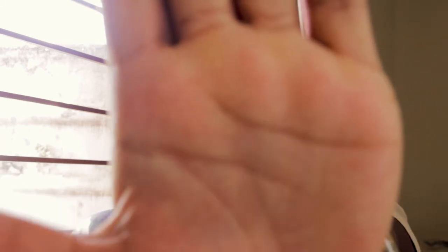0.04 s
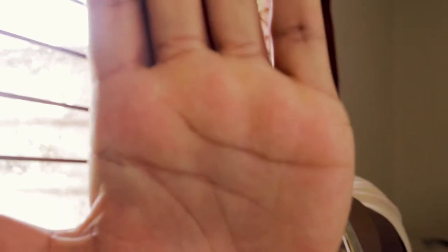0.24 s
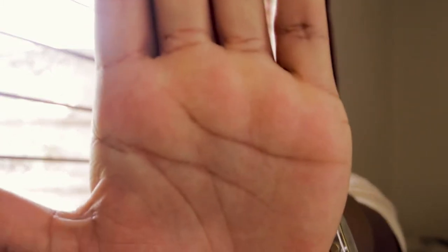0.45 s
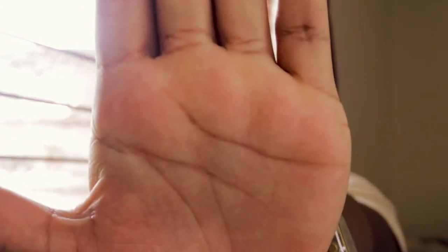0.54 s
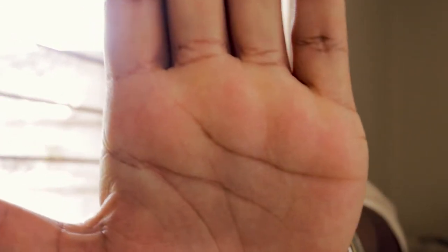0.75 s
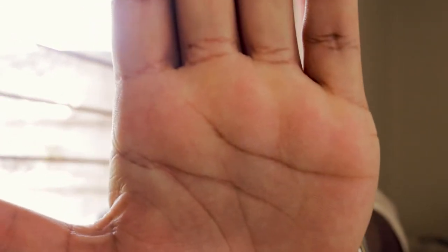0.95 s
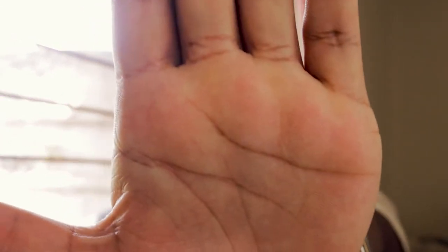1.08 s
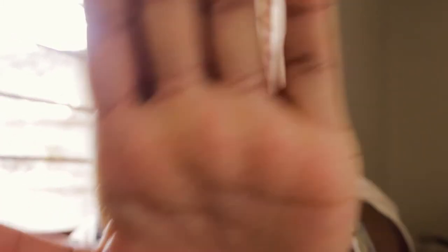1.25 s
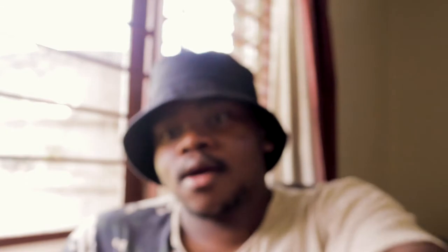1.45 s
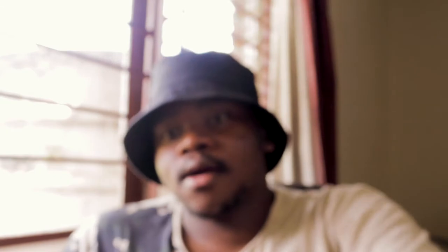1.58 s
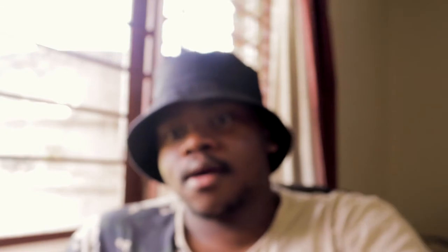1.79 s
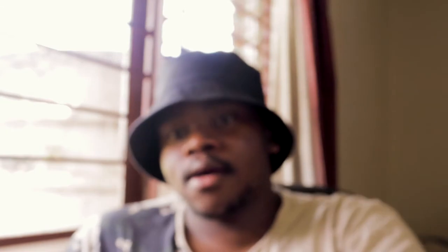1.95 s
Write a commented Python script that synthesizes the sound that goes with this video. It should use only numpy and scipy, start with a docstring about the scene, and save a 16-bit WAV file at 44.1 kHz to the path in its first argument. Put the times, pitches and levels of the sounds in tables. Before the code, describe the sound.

Two gritty, pulsing whirs of a lens focusing motor in quick succession, the first starting with a clack and knock, then near silence in a small room and one low hollow thump.

```python
"""Two rasping whirs in quick succession, the second longer, then about a second later a soft, hollow thump.
A lens focus motor close to the microphone takes up its gear slack with a clack and a hollow knock.
Tooth clicks and friction, stronger once per turn, ring the plastic barrel and small gears over a churn.
Scuffing contacts and decaying sine modes make the thump; filtered noise makes its echo, faint handling,
low room rumble and hiss."""
import sys
import numpy as np
from scipy import signal
from scipy.fft import rfft, irfft
from scipy.io import wavfile
from scipy.ndimage import uniform_filter1d

SR = 44100
rng = np.random.default_rng(int(sys.argv[2]) if len(sys.argv) > 2 else 0)


def transcribe(u):
    """Save the signal u as a 16-bit wav file named by the first command-line argument.

    u: samples, shape (n,) or (channels, n), limited to [-1, 1]; the rate is SR.
    q: integer samples, one column per channel.
    """
    v = np.clip(np.atleast_2d(u).T, -1, 1)
    q = np.round(v * 32767).astype(np.int16)
    wavfile.write(sys.argv[1], SR, q)


N = 89126
T, HZ = np.arange(N) / SR, np.fft.rfftfreq(N, 1 / SR)

# Motor runs. Each row: start in seconds, stop in seconds, relative level in dB.
MOTOR_RUNS = [(0.049, 0.223, -29.5), (0.251, 0.696, -28.5)]
# Harder rubbing once per turn. Each row: start in seconds, length in seconds, relative level in dB.
TURN_RUBS = [(0.052, 0.03, -19), (0.081, 0.037, -19.5), (0.131, 0.029, -18.5), (0.17, 0.031, -18),
             (0.256, 0.031, -19), (0.29, 0.028, -18), (0.33, 0.031, -19), (0.372, 0.031, -18.5),
             (0.411, 0.032, -20), (0.449, 0.035, -20.5), (0.493, 0.03, -18.5), (0.532, 0.029, -19),
             (0.57, 0.031, -19), (.613, .028, -18.5), (0.653, 0.028, -19.5)]
# Barrel resonances. Each row: frequency in Hz, width in Hz, relative level in dB.
BARREL_MODES = [(916, 79, -8), (1050, 55, -8), (1315, 55, -8), (1527, 50, -1), (1578, 57, -1),
                (1765, 150, -10), (2157, 160, -8), (2555, 176, -5), (2803, 85, 1), (3030, 180, -6),
                (3416, 140, -2.5), (3612, 195, -3.5), (3860, 260, -11), (4370, 340, -17.5)]
# Small-gear resonances. Each row: frequency in Hz, width in Hz, relative level in dB.
GEAR_MODES = [(5024, 256, -5), (5720, 300, -9), (6270, 170, -2.5), (6980, 350, -9.5), (7790, 600, -10),
              (9050, 380, 0.5), (10280, 200, 0.5), (10720, 210, -6), (11160, 320, -2), (11650, 180, -7),
              (12220, 340, -5.5), (13640, 380, -9), (14400, 400, -10.5), (15600, 500, -16)]
# Spectrum of the motor's steady churn. Each row: frequency in Hz, relative density in dB per Hz.
CHURN_SPECTRUM = [(20, -45), (55, -17), (100, -3.5), (170, -5), (290, -3.5), (390, -12.5), (480, -5),
                  (680, -8), (930, -1), (1180, -4.5), (1420, -4.5), (1560, 3), (1800, -7), (2500, -12),
                  (3600, -10.5), (5000, -21), (16000, -39)]
# Gear slack taken up. Each row: start in seconds, relative level in dB, pitch in Hz, width in Hz,
# decay constant in seconds.
SLACK_CLACKS = [(.0565, -15.5, 7400, 2000, 0.001), (.056, -27, 14500, 2310, 0.0027),
                (.059, -25.5, 920, 210, 0.014), (0.067, -23, 9700, 6000, 0.013),
                (0.066, -17, 750, 350, 0.0065), (0.071, -21.5, 1250, 604, 0.014),
                (0.076, -21, 313, 258, 0.0056)]
# Contacts of the thump. Each row: start in seconds, relative level in dB.
THUMP_CONTACTS = [(1.736, -23), (1.7385, -21.5), (1.743, -17.5), (1.7465, -17.5)]
# Spectrum of the contacts. Each row: frequency in Hz, relative density in dB per Hz.
SCUFF_SPECTRUM = [(30, -32), (100, 1), (330, -2), (550, 3.5), (1100, -0.5), (1650, -12), (1950, -5.5),
                  (2300, -15), (2700, -9), (3600, -14), (5300, -13), (8000, -18.5), (11000, -23.5),
                  (16000, -22)]
# Modes of the hollow body. Each row: frequency in Hz, mean level in dB, t60 in seconds.
BODY_MODES = [(65, -22, .3), (97, -23.5, .15), (114.7, -13.5, .32), (115.1, -29, .85), (172, -19.5, 0.14),
              (190, -20.5, 0.57), (222.8, -24, 0.31), (291.6, -25.5, 0.17), (476, -29, 0.16),
              (544.6, -11, .05), (556.7, -23, 0.19), (649, -24.5, 0.14), (716, -29, 0.072),
              (802, -25.5, 0.11)]
# Spectrum of the room's answer to the thump. Each row: frequency in Hz, relative density in dB per Hz.
ECHO_SPECTRUM = [(40, -24), (120, -12), (250, -2.5), (400, -9.5), (560, 10), (800, -12), (1100, -9.5),
                 (1700, -22.5), (2700, -23), (3600, -26), (5300, -20.5), (8000, -19.5), (16000, -26)]
# Handling rubs and bumps. Each row: start in seconds, length in seconds, relative level in dB,
# pitch in Hz, width in Hz.
HANDLING_BUMPS = [(.005, 0.015, -44.5, 100, 70), (0.263, 0.0083, -34.5, 91, 70),
                  (0.731, 0.039, -54, 206, 70), (0.907, 0.039, -49, 65, 50), (1.003, .012, -61, 3260, 500),
                  (1.275, 0.019, -56.5, 3900, 700), (1.324, 0.0082, -44, 80, 70),
                  (1.378, 0.02, -42, 52, 30), (1.78, .007, -49, 5130, 450)]
# Room decay. Each row: frequency in Hz, t60 in seconds.
ROOM_T60 = [(60, 0.44), (250, 0.73), (700, 0.2), (3000, 0.5), (8000, 0.14), (16000, 0.11)]
# Spectrum of the room rumble. Each row: frequency in Hz, relative density in dB per Hz.
RUMBLE_SPECTRUM = [(20, -8), (34, -4), (58, -4.5), (116, -2.5), (138, -11.5), (177, -5), (285, -17.5),
                   (574, -16.5), (700, -20), (1480, -22.5), (4000, -27), (9670, -31), (13000, -30.5),
                   (16000, -36)]
# Faint bands in the microphone's hiss. Each row: frequency in Hz, width in Hz, relative level in dB.
HISS_BANDS = [(11630, 960, -6), (14100, 500, -4), (14820, 380, 0.5)]

SPIN_UP_S, COAST_S = 0.003, 0.0045
EASE_S, EASE_DB = 0.016, -2  # level change over the end of each run
IDLE_DB, IDLE_START_S, IDLE_STOP_S = -39.5, 0.226, 0.2406  # gears tick over between the runs
GRIP_S, SLIP_S, ARCH_DB = 0.0047, 0.0047, 4  # rise, decay constant, edge drop of each rub
TEETH_HZ, TOOTH_JITTER, TOOTH_SPREAD_DB = 1133, 0.12, 1.5
TOOTH_SHARE = 0.34  # power share of clicks; the rest is friction
BARREL_DB, GEARS_DB, CHURN_DB = -0.5, -6, -1.5
BARREL_RUN_DB, GEARS_RUN_DB = -3.5, -5  # steady running against the rubs
GEARS_SWING = 1.32  # exponent on the rubs
KNOCK_S, KNOCK_HZ, KNOCK_DB, KNOCK_RISE_S, KNOCK_T60_S = 0.0695, 833, -8.5, 0.00665, 0.015
THUMP_S, SCUFF_DECAY_S = 1.7385, 0.0021
CRACK_HZ, CRACK_WIDTH_HZ, CRACK_DB, CRACK_DECAY_S = 2720, 420, -26, 0.0077
BODY_RISE_S, BODY_HOLD_S = 0.0031, 0.01
BODY_WAVER = 0.28  # rms, as a fraction of level and as phase in radians
ECHO_DB, ECHO_RISE_S = -25, 0.019
MOTOR_WET_DB, RUMBLE_DB, HISS_DB = -29.5, -49, -61
LOW_CUT_HZ, EDGE_HZ = 44, 15820


def motor():
    """Teeth drive barrel and gears, harder on each turn, over a churn; each run's level eases, then stops."""
    running = amp(IDLE_DB) * gate(IDLE_START_S, IDLE_STOP_S, SPIN_UP_S, COAST_S)
    for start, stop, db in MOTOR_RUNS:
        easing_db = EASE_DB * np.clip(1 - (stop - T) / EASE_S, 0, 1)
        running = running + amp(db + easing_db) * gate(start, stop, SPIN_UP_S, COAST_S)

    rubbing = np.zeros(N)
    for start, length, db in TURN_RUBS:
        position = 2 * (T - start) / length - 1
        arch_db = -ARCH_DB * np.minimum(position ** 2, 1)
        rubbing += amp(db + arch_db) * gate(start, start + length, GRIP_S, SLIP_S)

    peak = rubbing.max()
    barrel_force = np.hypot(amp(BARREL_RUN_DB) * running, rubbing)
    gear_force = np.hypot(amp(GEARS_RUN_DB) * running, peak * (rubbing / peak) ** GEARS_SWING)
    drive = shifting(teeth())
    barrel = colour(drive * barrel_force, peaks(BARREL_MODES, skirt=1.98))
    gears = colour(drive * gear_force, peaks(GEAR_MODES, skirt=1.42))
    churn = colour(teeth() * running, amp(read(CHURN_SPECTRUM, HZ)))
    return amp(BARREL_DB) * barrel + amp(GEARS_DB) * gears + amp(CHURN_DB) * churn


def teeth():
    """Tooth clicks of uneven spacing, sign and level, mixed with sliding friction as white noise."""
    rate_hz = TEETH_HZ * (1 + TOOTH_JITTER * unit(uniform_filter1d(noise(), size=60)))
    clicks = np.diff(np.floor(np.cumsum(rate_hz) / SR), prepend=0)  # one per whole cycle
    clicks = clicks * np.sign(noise()) * amp(TOOTH_SPREAD_DB * noise())
    return np.sqrt(TOOTH_SHARE) * unit(clicks) + np.sqrt(1 - TOOTH_SHARE) * noise()


def shifting(x, patchy_db=2.0):
    """As the teeth meet differently, the rasp's weight shifts between neighbouring bands."""
    z = signal.stft(x, SR, nperseg=256)[2]
    patches = rng.standard_normal(z.shape[::-1])
    patches = uniform_filter1d(patches, size=7, axis=0)  # over time
    patches = uniform_filter1d(patches, size=2, axis=1)  # over frequency
    return signal.istft(z * amp(patchy_db * unit(patches).T), SR, nperseg=256)[1][:N]


def take_up(rise_s=0.0006, hold_s=0.00067):
    """Gear slack closes in resonant noise clacks; a sine knock follows as the lens group starts to move."""
    clacks = np.zeros(N)
    for start, db, hz, width, decay in SLACK_CLACKS:
        burst = noise() * gate(start, start + hold_s, rise_s, decay)
        clacks += amp(db) * colour(burst, peaks([(hz, width, 0)], skirt=1.37))
    ring = gate(KNOCK_S, KNOCK_S + KNOCK_RISE_S, KNOCK_RISE_S, KNOCK_T60_S / np.log(1000))
    return clacks + amp(KNOCK_DB) * ring * np.sin(2 * np.pi * KNOCK_HZ * (T - KNOCK_S))


def thump(rise_s=0.00049, hold_s=0.00076):
    """Scuffing contacts and a short crack; the hollow body's modes boom on unevenly and the room answers."""
    contact = sum(amp(db) * gate(s, s + hold_s, rise_s, SCUFF_DECAY_S) for s, db in THUMP_CONTACTS)
    scuffs = colour(noise() * contact, amp(read(SCUFF_SPECTRUM, HZ)))

    burst = noise() * gate(THUMP_S, THUMP_S + hold_s, rise_s, CRACK_DECAY_S)
    crack = amp(CRACK_DB) * colour(burst, peaks([(CRACK_HZ, CRACK_WIDTH_HZ, 0)], skirt=1.9))

    boom = np.zeros(N)
    for hz, db, t60 in BODY_MODES:
        envelope = gate(THUMP_S, THUMP_S + BODY_HOLD_S, BODY_RISE_S, t60 / np.log(1000))
        level = amp(db) * envelope * (1 + BODY_WAVER * waver())
        boom += level * np.sin(2 * np.pi * hz * (T - THUMP_S) + BODY_WAVER * waver())
    return scuffs + crack + boom + echo()


def waver(rate_hz=35):
    """Smooth random wandering of rms 1: noise through a Gaussian low-pass."""
    return unit(irfft(rfft(noise()) * np.exp(-(HZ / rate_hz) ** 2), N))


def echo():
    """The room's answer to the thump: coloured noise, each band dying at its own speed."""
    hz, t, z = signal.stft(colour(noise(), amp(read(ECHO_SPECTRUM, HZ))), SR, nperseg=256)
    decay_db = -60 * np.maximum(t - THUMP_S, 0) / read(ROOM_T60, hz)[:, None]
    tail = signal.istft(z * amp(decay_db), SR, nperseg=256)[1]
    return amp(ECHO_DB) * tail[:N] * np.clip((T - THUMP_S) / ECHO_RISE_S, 0, 1)


def handling(rise_s=0.0055, fall_s=0.008):
    """Faint, soft rubs and bumps: noise bursts through one resonance each."""
    bumps = np.zeros(N)
    for start, length, db, hz, width in HANDLING_BUMPS:
        burst = noise() * gate(start, start + length, rise_s, fall_s)
        bumps += amp(db) * colour(burst, peaks([(hz, width, 0)], skirt=2.0))
    return bumps


def room(x):
    """Diffuse tail of a small room: convolution with noise, each band dying at its own speed."""
    hz, t, z = signal.stft(rng.standard_normal(SR // 2), SR, nperseg=256)
    decay_db = -60 * t / read(ROOM_T60, hz)[:, None]
    tail = signal.istft(z * amp(decay_db), SR, nperseg=256)[1]
    return signal.fftconvolve(x, tail / np.linalg.norm(tail))[:N]


def background():
    """Low room rumble and microphone hiss with a few faint high bands, both filtered noise."""
    rumble = unit(colour(noise(), amp(read(RUMBLE_SPECTRUM, HZ))))
    hiss = unit(colour(noise(), peaks(HISS_BANDS, skirt=2.2)))
    return amp(RUMBLE_DB) * rumble + amp(HISS_DB) * hiss


def noise():
    """White noise of rms 1."""
    return rng.standard_normal(N)


def gate(start, stop, rise, fall):
    """Straight attack, hold, exponential release; all times in seconds."""
    return np.clip((T - start) / rise, 0, 1) * np.exp(-np.maximum(T - stop, 0) / fall)


def peaks(modes, skirt=1.5):
    """Gain curve of a set of resonances, their powers summed; a higher skirt falls off faster far out."""
    power = 0
    for hz, width, db in modes:
        detuning = 2 * (HZ - hz) / width
        power = power + amp(db) ** 2 / (1 + detuning ** 2 / skirt) ** skirt
    return np.sqrt(power)


def colour(x, gain):
    """Causal minimum-phase filter with the given gain curve, scaled to keep white noise at its rms."""
    shape = gain / gain.max()
    cepstrum = irfft(np.log(np.maximum(shape, 1e-5)), N)
    cepstrum[1:N // 2] *= 2  # fold onto positive time
    cepstrum[N // 2 + 1:] = 0
    return irfft(rfft(x) * np.exp(rfft(cepstrum)), N) / np.sqrt(np.mean(shape ** 2))


def read(points, hz):
    """Reads a table on a log-frequency axis."""
    f, value = np.transpose(points)
    return np.interp(np.log(hz + 1), np.log(f + 1), value)


def unit(x):
    """Scales to rms 1."""
    return x / np.sqrt(np.mean(x ** 2) + 1e-20)


def amp(db):
    """Decibels to gain."""
    return 10 ** (np.asarray(db) / 20)


def scene():
    """The lens with its room tail, the thump, the handling and the background."""
    lens = motor() + take_up()
    wet = amp(MOTOR_WET_DB) * room(lens)
    return (lens + wet + thump() + handling() + background())[None]


def record(dry):
    """The microphone's low cut and the recorder's band limit."""
    low_cut = signal.butter(4, LOW_CUT_HZ, "high", fs=SR, output="sos")
    thin = signal.sosfilt(low_cut, dry)
    band_limit = signal.firwin(511, EDGE_HZ, window=("kaiser", 9), fs=SR)
    return signal.oaconvolve(thin, band_limit[None], "same")


dry = scene()
out = record(dry)
transcribe(out)
```